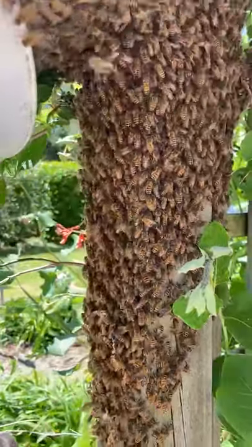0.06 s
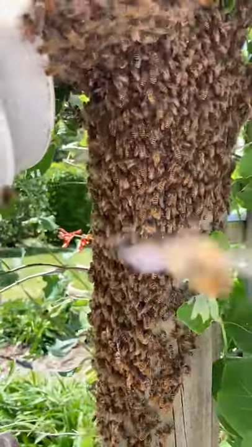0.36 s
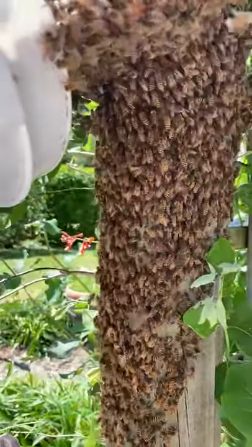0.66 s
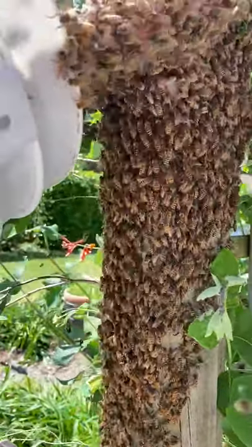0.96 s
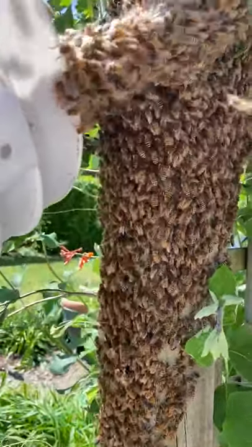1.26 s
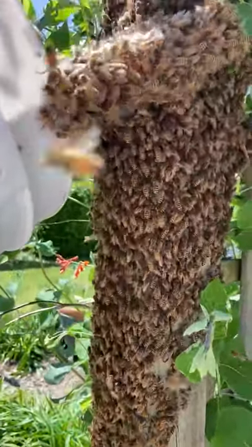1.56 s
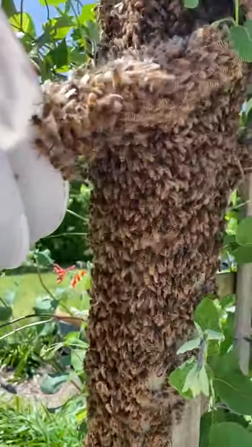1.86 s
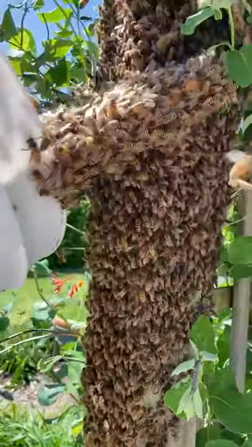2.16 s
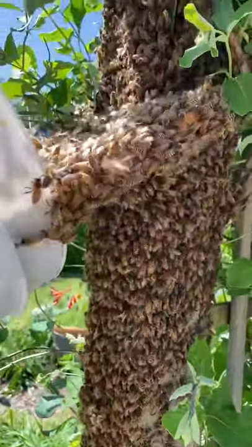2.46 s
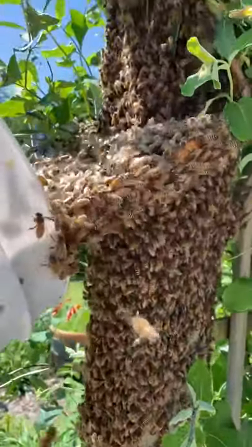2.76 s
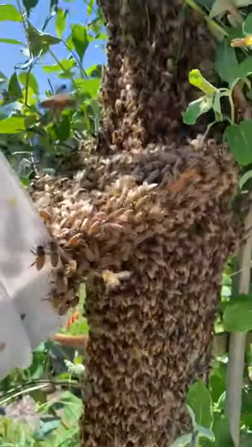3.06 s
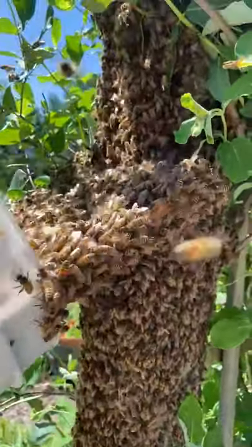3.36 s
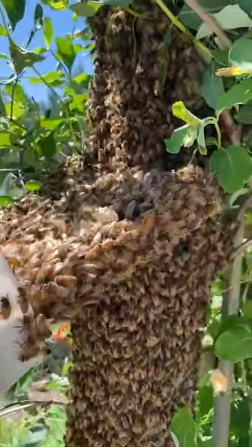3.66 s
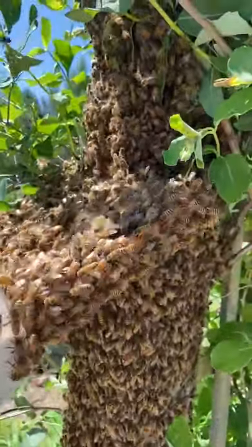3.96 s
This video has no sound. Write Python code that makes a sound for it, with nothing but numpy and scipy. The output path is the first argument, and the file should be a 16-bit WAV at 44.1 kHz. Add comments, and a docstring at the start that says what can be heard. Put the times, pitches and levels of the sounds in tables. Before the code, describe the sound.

A honeybee swarm hums, with single bees buzzing close past and a distant engine droning.

```python
"""A swarm of honeybees hums and rustles on a garden post throughout, while a small engine, likely a
mower, drones further off. At 0.44 s a bee passes very close: its wingbeat buzz swells and drops in
pitch, and the wash of its wings thumps and churns on the microphone. More bees pass, the loudest at
1.8 s and 3 s. A tiny tick comes at 2.5 s; low puffs of wing air then crowd the rest of the scene."""
import sys
import numpy as np
from scipy import signal
from scipy.fft import rfft, irfft
from scipy.io import wavfile

SR = 44100
rng = np.random.default_rng(int(sys.argv[2]) if len(sys.argv) > 2 else 0)


def materialize(psi):
    """Save the field psi as 16-bit PCM at rate SR to the path in sys.argv[1].

    A 1-D psi becomes a single channel; in a 2-D psi each row is a channel.
    """
    bounded = np.clip(np.atleast_2d(psi).T, -1, 1)
    quanta = np.round(bounded * 32767).astype(np.int16)
    wavfile.write(sys.argv[1], SR, quanta)


N = 176400
T, FREQS = np.arange(N) / SR, np.fft.rfftfreq(N, 1 / SR)


def amp(db):
    """Decibels to gain."""
    return 10 ** (np.asarray(db) / 20)


def unit(x):
    """Scales to rms 1."""
    return x / np.sqrt(np.mean(abs(x) ** 2) + 1e-20)


def at_hz(points, hz):
    """Interpolates a table on a log-frequency axis."""
    f, value = np.transpose(points)
    return np.interp(np.log(hz + 1), np.log(f + 1), value)


def drift(hz):
    """Random wander of rms about 1, at rates up to about hz."""
    size = 8192
    f = np.fft.rfftfreq(size, 2 * T[-1] / size)
    slow = unit(irfft(rfft(rng.standard_normal(size)) * np.exp(-(f / hz) ** 2) * (f > 0)))
    return np.interp(T, np.linspace(0, 2 * T[-1], size), slow)


def noise(spectrum):
    """Coloured noise of rms 1."""
    return unit(irfft(rfft(rng.standard_normal(N)) * amp(at_hz(spectrum, FREQS)), N))


def bell(centre_s, half_s):
    """Gaussian swell and fade."""
    return np.exp(-.5 * ((T - centre_s) / half_s) ** 2)


def pan(db):
    """Stereo gains, left over right by db."""
    return amp([[db / 2], [-db / 2]])


# Each row: frequency in Hz, phase lead of the left channel in radians.
STEREO_PHASE = [(0, 0), (200, .1), (600, 1.2), (1250, 1.6), (1600, 4.9), (1980, 6.4), (2760, 7.7),
                (3620, 7.4), (4400, 7.1), (5150, 6.3), (5700, 7.2), (6500, 8.9), (7500, 9.42), (8200, 9.8),
                (9500, 12.1), (11300, 12.9), (12600, 15.2), (14300, 16), (15600, 18.1)]
# Each row: frequency in Hz, left over right in dB.
STEREO_BALANCE = [(60, .3), (200, .6), (380, 3.3), (700, 6.2), (1290, 4), (2000, -.5), (2500, -1.5),
                  (4400, -.3), (8000, 0)]
# Each row: frequency in Hz, left-right coherence from 0 to 1.
STEREO_COHERENCE = [(60, 1), (250, 0.91), (500, 0.56), (1200, 0.041), (2000, 0.7), (3000, 0.62),
                    (5000, 0.97), (7000, 1), (15000, 1)]

def widen(source, independent=None):
    """Widens the sound by phase and level; an independent signal makes the channels less alike."""
    left = right = rfft(source)
    if independent is not None:
        alike = np.clip(at_hz(STEREO_COHERENCE, FREQS), 0, 1)
        right = alike * left + np.sqrt(1 - alike ** 2) * rfft(independent)
    tilt = amp(at_hz(STEREO_BALANCE, FREQS) / 2)
    lag = np.exp(-1j * at_hz(STEREO_PHASE, FREQS))
    return irfft(np.array([left * tilt, right / tilt * lag]), N)


# Exhaust and blade noise. Each row: frequency in Hz, relative density in dB.
EXHAUST_SPECTRUM = [(20, -36), (50, -5), (110, 1.5), (230, -4), (320, -12.5), (500, -7.5), (700, -20),
                    (1250, -21), (2000, -32.5), (5000, -52.5)]

def exhaust(cycle_rad, level_db=-34.5):
    """Exhaust and blade noise throbs with the puff of each engine cycle."""
    throb = unit(1 + .34 * np.cos(cycle_rad) + .29 * np.cos(2 * cycle_rad)) * amp(level_db)
    return widen(throb * noise(EXHAUST_SPECTRUM), throb * noise(EXHAUST_SPECTRUM))


# Each row: time in seconds, four-stroke cycles per second.
ENGINE_SPEED = [(0, 25), (.38, 24.95), (.58, 25.2), (.91, 25), (1.1, 25.3), (1.68, 25.05), (2.03, 25.35),
                (2.2, 25.2), (2.4, 25.35), (3.38, 25.36), (3.6, 25.3), (4, 25.1)]
# Each row: time in seconds, levels of orders 4, 5, 6, 8, 20 and 24 in dB, whine swell in dB.
MAIN_ORDERS = [(0, -21, -33, -42.5, -47, -41.5, -49, 2), (.3, -23, -38.5, -33, -36.5, -41, -53.5, -2),
               (.6, -22.5, -40, -34.5, -38, -47, -54, 1.5), (.8, -20.5, -39, -36, -29.5, -51, -53.5, -3),
               (1.05, -22, -34, -33, -32, -40.5, -49, -8.5), (1.38, -23, -44, -30.5, -28.5, -41, -56, -2),
               (1.6, -24, -44, -31, -32, -43, -45.5, 0), (1.8, -21, -39, -28.5, -36.5, -50, -47, -9),
               (2.08, -27, -35.5, -31.5, -31, -38, -41, 1.5),
               (2.22, -24, -31, -30.5, -37.5, -39.5, -54, 1.5),
               (2.48, -25.5, -31, -31.5, -28.5, -53, -50.5, -0.5),
               (2.75, -26.5, -35.5, -32.5, -34.5, -66, -48.5, 1),
               (3.0, -29.5, -36, -33, -30, -42, -54, 4.5), (3.2, -28, -38, -36, -27, -57, -47.5, 2.5),
               (3.35, -28, -37, -44, -28.5, -40, -39.5, 5.5), (3.6, -38.5, -38, -38, -30, -41, -42, 7),
               (3.75, -42, -39, -41.5, -40.5, -50, -61, -3), (4, -34.5, -49, -45, -53, -64, -60, -6)]
# Each row: time in seconds, level of order 32 in dB.
ORDER_32 = [(0, -65), (1.2, -53), (2.3, -61), (2.7, -48), (3.1, -52), (3.5, -49.5), (4, -54)]
# Each row: order as a multiple of the cycle rate, level in dB.
WEAK_ORDERS = [(2, -45), (3, -46), (7, -43.5), (9, -43), (10, -47), (11, -50), (12, -43.5), (13, -54),
               (14, -52), (15, -52), (18, -65.5), (28, -59.5), (36, -59), (40, -61), (44, -63)]
# Two whining partials: their orders, then their levels in dB before the swell.
WHINE_MULTIPLES = [16, 48.65]
WHINE_BASE_DB = [-46, -54.5]

def engine(waver_hz=4.9, puff_order=6):
    """A single cylinder fires a little unevenly: a stack of wavering orders over exhaust noise."""
    cycle_hz = np.interp(T, *np.transpose(ENGINE_SPEED)) * (1 + .0019 * drift(8.5))
    cycle_rad = 2 * np.pi * np.cumsum(cycle_hz) / SR
    times, *columns = np.transpose(MAIN_ORDERS)
    *main_db, swell_db = (np.interp(T, times, column) for column in columns)
    orders = list(zip([4, 5, 6, 8, 20, 24], main_db))
    orders += [(32, np.interp(T, *np.transpose(ORDER_32))), *WEAK_ORDERS]
    orders += [(k, db + swell_db) for k, db in zip(WHINE_MULTIPLES, WHINE_BASE_DB)]
    firing = 1 + .061 * drift(21)
    tone = np.zeros(N)
    for k, db in orders:
        waver = .11 + .0047 * k
        # The exhaust and the garden pull the orders out of step.
        phase = k * cycle_rad + .25 * (k - puff_order) ** 2 + .42 * rng.standard_normal()
        partial = (1 + waver * drift(waver_hz)) * firing * np.cos(phase)
        partial += waver * drift(waver_hz) * np.sin(phase)
        tone += amp(db) * partial / np.sqrt(.5 + waver ** 2)
    return widen(tone) + exhaust(cycle_rad)


def tick(start_s=2.5086, decay_s=.00025):
    """One tiny sharp tick close by."""
    burst = (T >= start_s) * np.exp(-abs(T - start_s) / decay_s) * rng.standard_normal((2, N))
    return amp(-27) * signal.sosfilt(signal.butter(2, 4000, "high", fs=SR, output="sos"), burst)


# Crawling bees and garden hiss. Each row: frequency in Hz, relative density in dB.
HISS_SPECTRUM = [(30, 2.5), (300, 8), (700, 9), (1250, 10.5), (1700, 5), (2500, 2), (3500, 3), (5000, 1.5),
                 (7000, -1.5), (10000, -2), (15500, -1.5)]

def rustle(clicks_per_s=150, crackle_db=-61, hiss_db=-45.5):
    """Legs and wings of crawling bees click in a steady hiss."""
    clicks = (rng.random(N) < clicks_per_s / SR) * amp(4 * np.minimum(rng.exponential(1, N), 3))
    crackle = unit(signal.sosfilt(signal.butter(2, 2500, "high", fs=SR, output="sos"), clicks))
    swell = amp(.4 * drift(11))
    near = amp(hiss_db) * noise(HISS_SPECTRUM) + amp(crackle_db) * crackle
    return swell * widen(near, amp(hiss_db) * noise(HISS_SPECTRUM))


def buzz(hz, spectrum, second_db=0, higher_db=0, count=20):
    """One bee: a wingbeat cycle rich in harmonics, repeated along a pitch curve."""
    k, size = np.arange(1, count + 1), 4096
    gains = amp(at_hz(spectrum, k * hz.mean()) + second_db * (k == 2) + higher_db * (k > 2))
    harmonics = gains * np.exp(2j * np.pi * rng.random(count))
    cycle = irfft(np.r_[0, harmonics], size) * size / np.sqrt(2)
    position = np.cumsum(hz) / SR % 1 * size
    return np.interp(position, np.arange(size + 1), np.r_[cycle, cycle[0]])


# Each row: frequency in Hz, relative level of a hum harmonic in dB.
HUM_SPECTRUM = [(200, -2.5), (260, -6), (480, 0.5), (700, -7.5), (1000, -8.5), (1300, -8), (1600, -14),
                (2100, -15), (3000, -20.5), (5000, -35.5)]

def swarm_hum(bees=14, wingbeat_hz=235.6):
    """Many bees buzz together, each wandering in pitch and distance."""
    hum = np.zeros(N)
    for hz in wingbeat_hz * (1 + rng.permutation(np.linspace(-.14, .14, bees))):
        pitch_hz = hz * (1 + .025 * drift(4) + .00504 * drift(50.3))
        hum += buzz(pitch_hz, HUM_SPECTRUM) * amp(5 * drift(8.2))
    return unit(hum)


# Each row: centre in seconds, half length in seconds, level in dB, left over right in dB.
AIR_PUFFS = [(0.49, 0.023, -30, 5), (1.08, 0.012, -37, 11), (1.33, 0.018, -42, 6), (2.614, 0.019, -32, 6),
             (2.78, .02, -35, 15), (2.897, 0.027, -30, 9), (3.302, 0.05, -26.5, 0.5),
             (3.597, 0.057, -39, 14), (3.766, 0.046, -35.5, 10), (3.856, 0.037, -38, 8),
             (3.928, 0.05, -35, 1.5)]
# Each row: frequency in Hz, relative density in dB.
PUFF_SPECTRUM = [(15, -46), (28, -21), (48, 5), (90, 13.5), (150, 8.5), (300, -16), (600, -23), (1500, -32),
                 (5000, -77)]

def buffets(thump_s=.4565, width_s=.0015, thump_db=-7):
    """Wing wash hits the microphone: low puffs, and one thump from the closest bee."""
    puffs = sum(pan(side_db) * amp(db) * bell(centre_s, half_s) * noise(PUFF_SPECTRUM)
                for centre_s, half_s, db, side_db in AIR_PUFFS)
    offset = (T - thump_s) / width_s
    thump = -amp(thump_db) * offset * np.exp(.5 - .5 * offset ** 2)
    return puffs + thump


# Tumbling air. Each row: frequency in Hz, relative density in dB.
CHURN_SPECTRUM = [(60, -23), (200, -6), (400, 5), (550, -5), (800, -18), (1500, -26), (5000, -68)]
# Each row: centre in seconds, half length in seconds, level in dB, pitch in Hz, slowing per second.
WAKE_EDDIES = [(0.4587, 0.00349, -18, 398.2, 29.1), (0.4843, .0075, -14.5, 179.5, 62)]

def wake():
    """The closest bee leaves churning air and eddies that slow as they roll over the microphone."""
    air = amp(-26) * bell(centre_s=.461, half_s=.016) * noise(CHURN_SPECTRUM)
    for centre_s, half_s, db, hz, slowing in WAKE_EDDIES:
        pitch_hz = hz * np.exp(-slowing * np.clip(T - centre_s, -2 * half_s, 2 * half_s))
        phase = 2 * np.pi * (np.cumsum(pitch_hz) / SR + rng.random())
        air += amp(db) * bell(centre_s, half_s) * np.cos(phase)
    return air


# Each row: frequency in Hz, relative level of a wingbeat harmonic in dB.
WING_SPECTRUM = [(240, 1), (480, 0), (730, -15.5), (980, -13.5), (1250, -28.5), (1700, -31.5), (2500, -36),
                 (5000, -46), (10000, -73)]
# Each row: closest moment in seconds, wingbeat in Hz, gain in dB, passing time in seconds, Doppler
# fraction, trims of the second and of higher harmonics in dB, left over right in dB, flutter depth.
BEE_PASSES = [(0.438, 247.5, -16.5, 0.016, .055, -3.5, -3.5, 3, 0.04),
              (.79, 228.3, -47, 0.064, 0.0092, -1, -2, 0.5, 0.3),
              (1.0, 246.8, -44, .08, 0.0092, -4.5, -4, -14, .2), (1.52, 244, -47, .05, .01, -9, -7, 2, 0.3),
              (1.811, 229, -31.5, 0.03, .008, -0.5, -4.5, 1.5, .3),
              (2.3, 250.3, -38.5, 0.11, .01, -4, -8, 4.5, 0),
              (3.01, 243.1, -25.5, 0.023, .01, -5.5, -9.5, 2.5, .08),
              (3.3, 231.7, -39.5, .05, 0.011, -13.5, -7, 8, 0),
              (3.81, 224, -48.5, 0.044, .01, -5, -2, -0.5, 0.1)]

def flyby(closest_s, hz, db, passing_s, doppler, second_db, higher_db, side_db, flutter):
    """A bee on a straight path swells, then drops in pitch; unsteady air makes its buzz flutter."""
    flutter_hz, falloff_power = 203, 1.75
    along = (T - closest_s) / passing_s
    distance = np.hypot(1, along)  # 1 when closest
    pitch_hz = hz * (1 - doppler * along / distance + .0606 * flutter * drift(flutter_hz))
    wings = buzz(pitch_hz, WING_SPECTRUM, second_db, higher_db, count=40)
    wings *= unit(1 + flutter * drift(flutter_hz))
    wing_air = widen(amp(-31) * noise(HISS_SPECTRUM))
    return amp(db) * (pan(side_db) * wings + wing_air) / distance ** falloff_power


def scene():
    """Swarm, passing bees and their wash, a tick, and the engine behind them."""
    hum_db = -40.5 + .94 * (T - T.mean())  # the microphone slowly moves closer
    swarm = amp(hum_db) * widen(swarm_hum(), swarm_hum()) + rustle()
    passes = sum(flyby(*row) for row in BEE_PASSES)
    return swarm + passes + buffets() + wake() + tick() + engine()


def record(dry):
    """Steep low-pass at 15780 Hz."""
    lowpass = signal.firwin(511, 15780, window=("kaiser", 9), fs=SR)
    return signal.oaconvolve(dry, lowpass[None], "same")


dry = scene()
out = record(dry)
materialize(out)
```